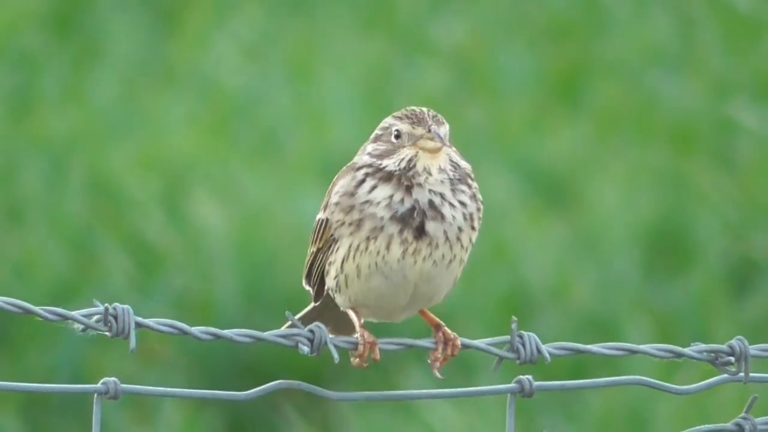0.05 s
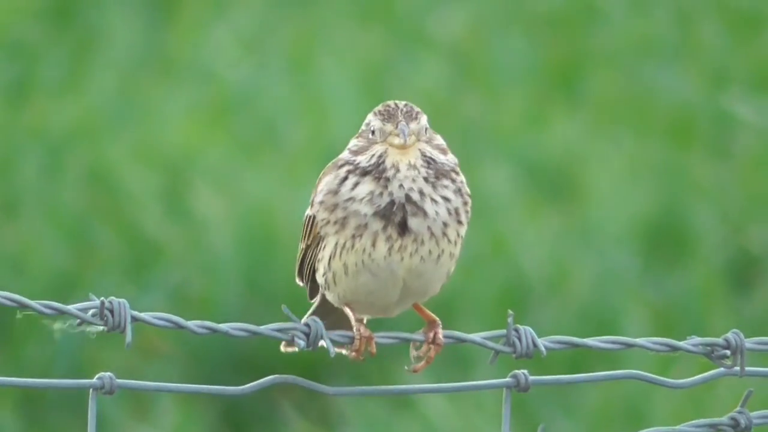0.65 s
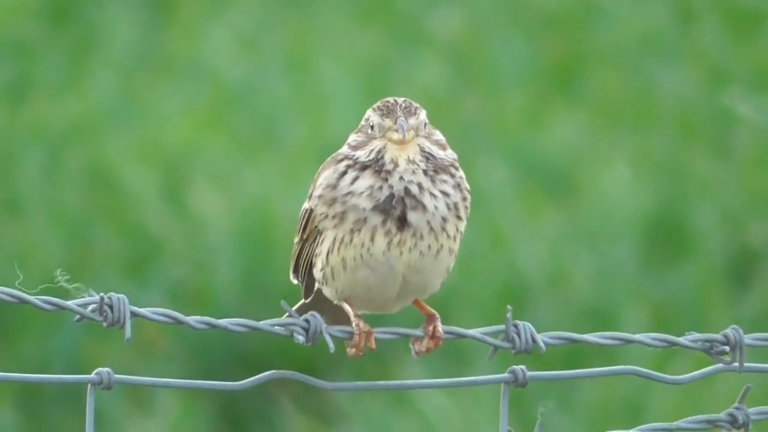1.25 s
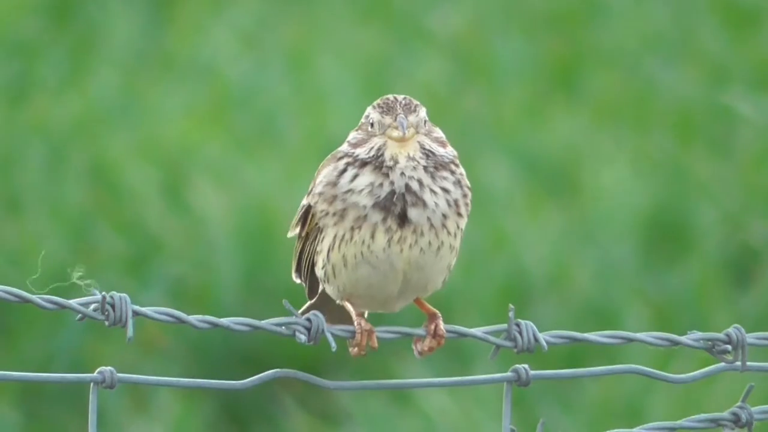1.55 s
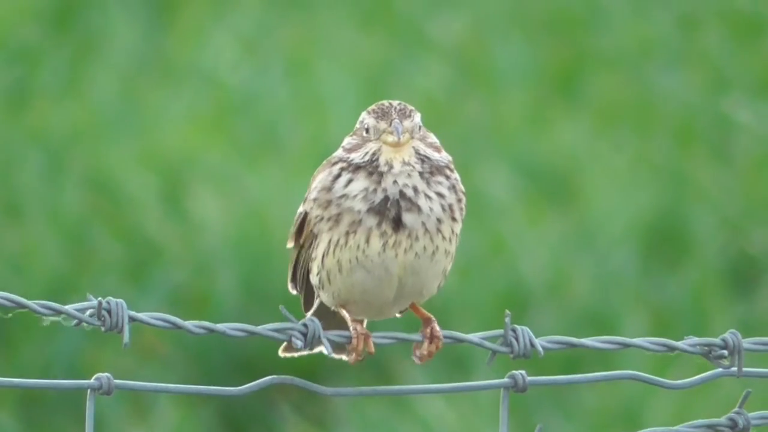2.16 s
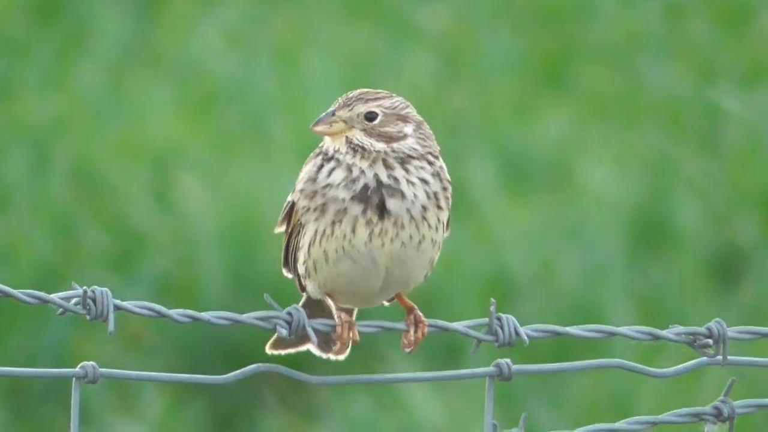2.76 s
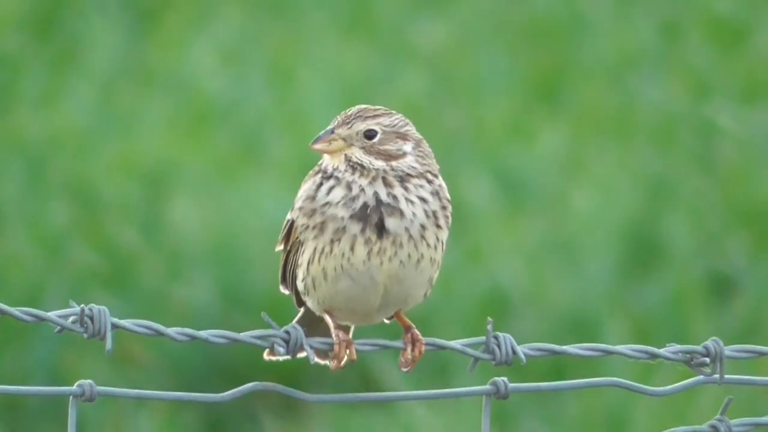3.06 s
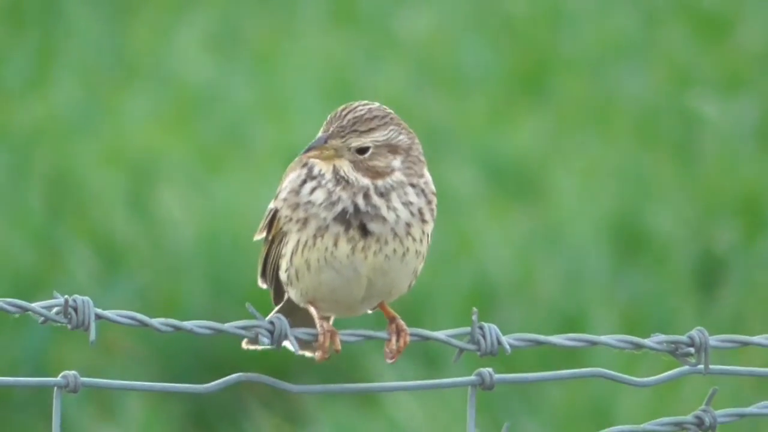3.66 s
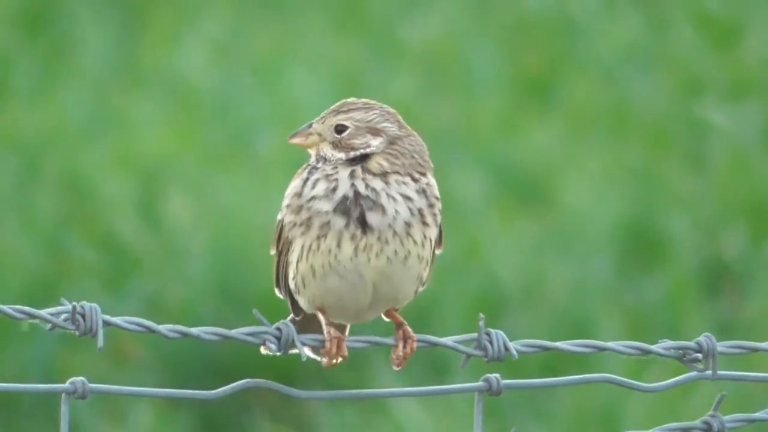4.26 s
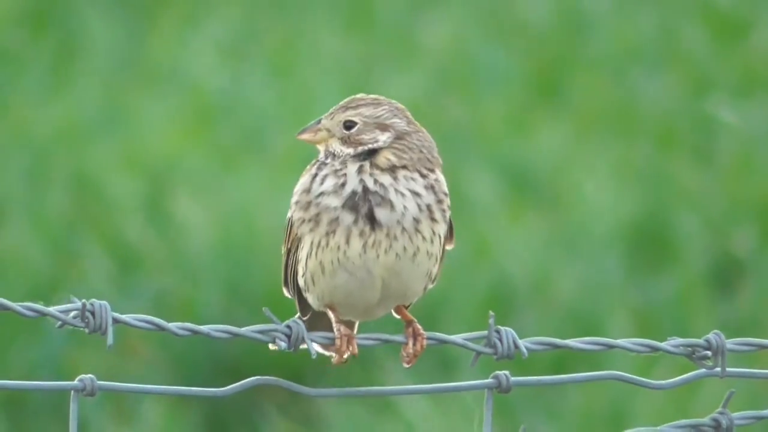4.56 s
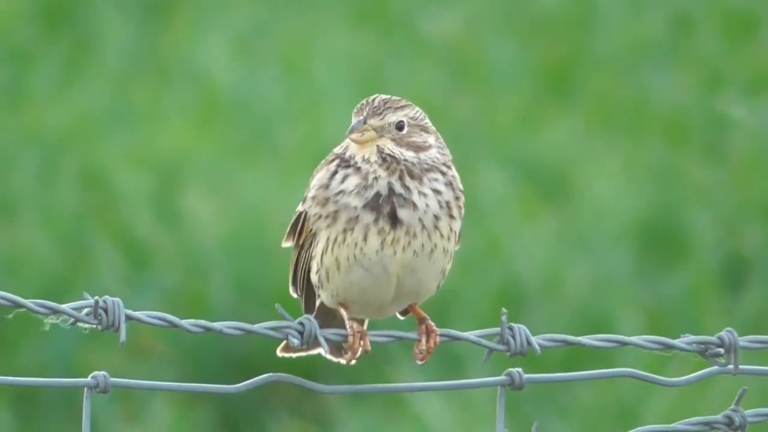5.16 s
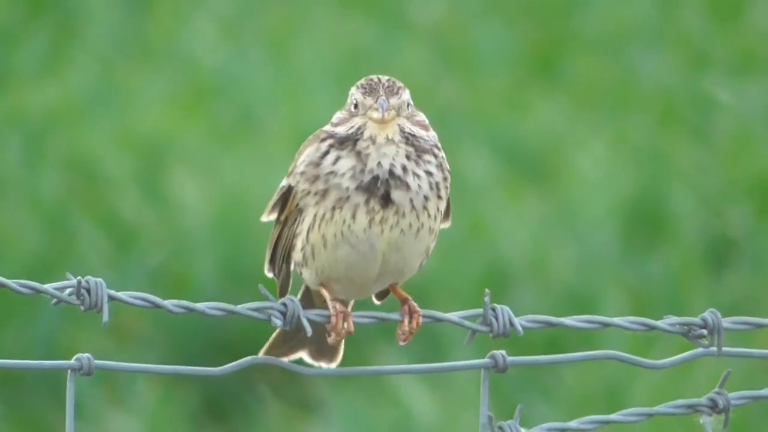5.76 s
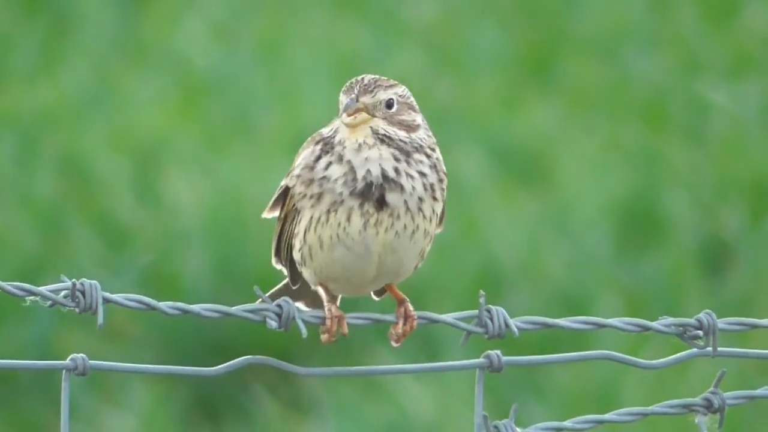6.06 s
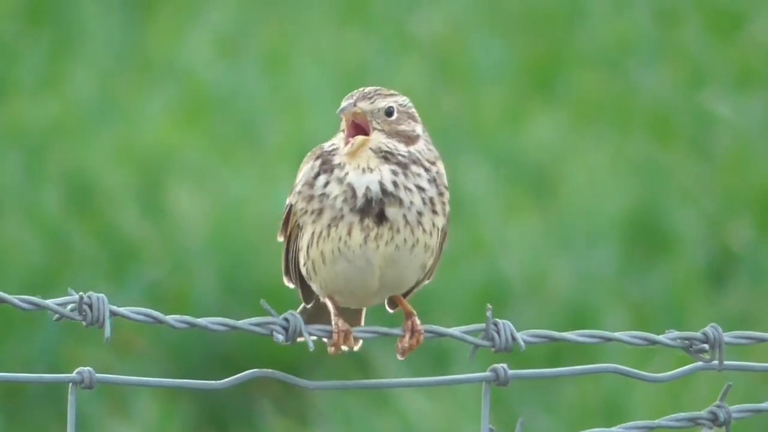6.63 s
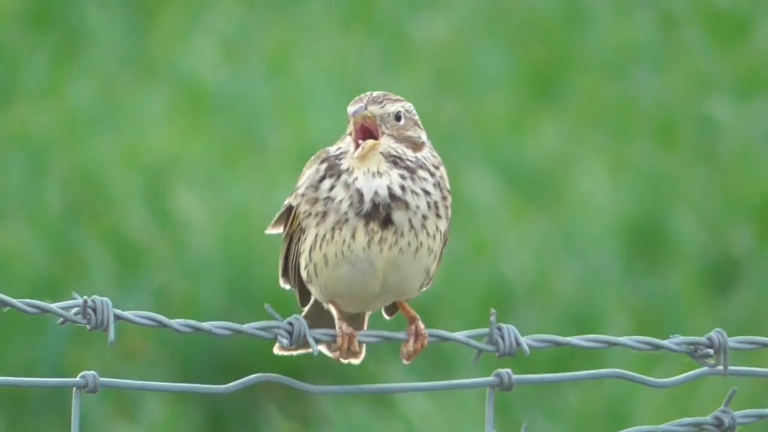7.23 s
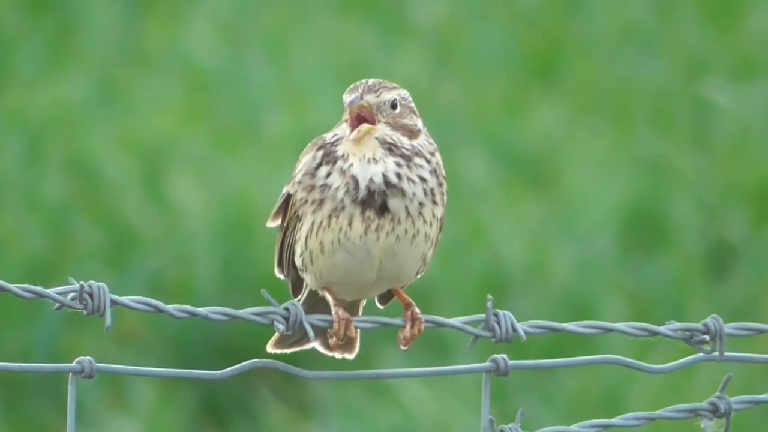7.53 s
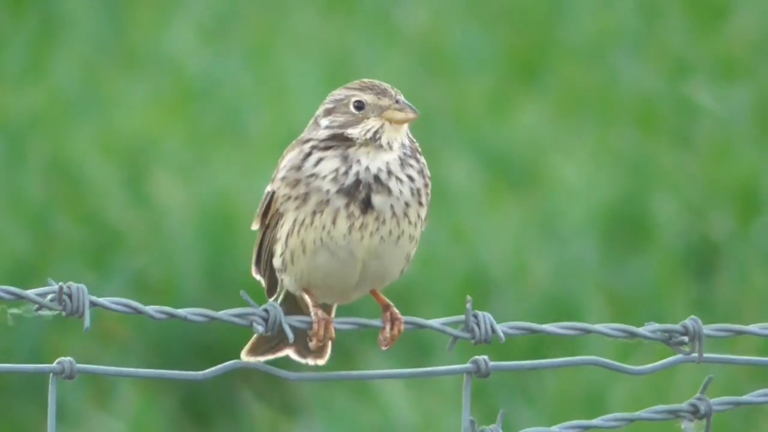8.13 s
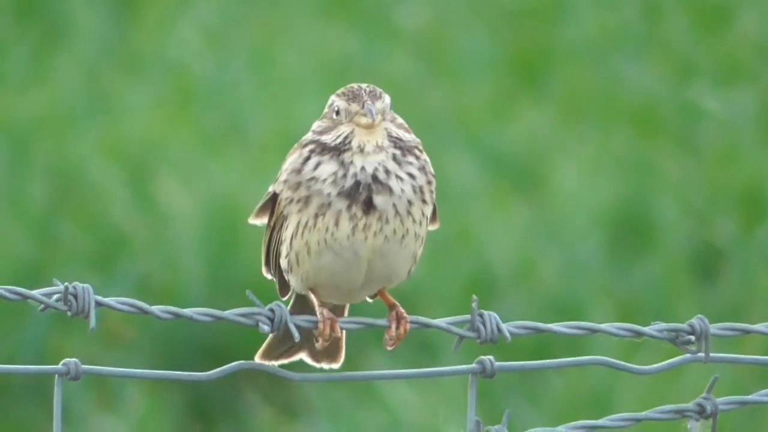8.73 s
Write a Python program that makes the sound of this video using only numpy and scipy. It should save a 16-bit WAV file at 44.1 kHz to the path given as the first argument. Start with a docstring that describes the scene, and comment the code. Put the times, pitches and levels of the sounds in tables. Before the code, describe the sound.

A small bird on a wire fence sings one short phrase, clear and near: sharp ticks, growing louder and faster, tumble into a high rattling jangle of buzzes and tiny whistles. For several seconds beforehand there is only quiet open countryside, with low wind and distant traffic, faint far birds, and the camera's own hiss and slight lens motor ticking. The same quiet background returns after the song.

```python
"""A bunting on a fence wire in an open field gives a few sharp ticks that speed into a dense jangle.
The two sides of its syrinx sound separate notes and trills, often at once; the grass scatters them.
Behind it: rumble of distant traffic and wind, faint far birds, and a camera's hiss and lens motor,
whose steps ring the camera body."""
import sys
import numpy as np
from scipy import signal
from scipy.fft import rfft, irfft
from scipy.io import wavfile
from scipy.ndimage import uniform_filter1d

SR = 44100
rng = np.random.default_rng(int(sys.argv[2]) if len(sys.argv) > 2 else 0)


def store_wav(level_fs):
    """Save 16-bit WAV to argv[1]."""
    pcm = np.round(np.clip(np.atleast_2d(level_fs), -1, 1) * 32767)
    wavfile.write(sys.argv[1], SR, pcm.T.astype(np.int16))


N = 396459
T = np.arange(N) / SR
HZ = np.fft.rfftfreq(N, 1 / SR)
SIDES = np.array([[.5], [-.5]])  # left, right


def amp(db):
    """Decibels to gain."""
    return 10 ** (np.asarray(db) / 20)


def unit(x):
    """Scales to rms 1."""
    return x / np.sqrt(np.mean(x ** 2))


def read(points):
    """Interpolates (Hz, value) rows onto HZ in log frequency."""
    hz, value = np.transpose(points)
    return np.interp(np.log(HZ + 1), np.log(hz + 1), value)


def noise(shape):
    """Noise of rms 1 with the given gains over HZ."""
    return unit(irfft(rfft(rng.standard_normal(N)) * shape, N))


def waver(top_hz):
    """Random motion of rms 1, rolling off at top_hz."""
    return noise(np.exp(-(HZ / top_hz) ** 2))


def air(spectrum, db):
    """Steady stereo noise, alike on both sides in the bass, less so higher up."""
    # Each row: frequency in Hz, left-right correlation.
    likeness = [(60, 0.92), (130, 0.99), (290, 0.46), (640, -0.19), (1410, 0.32), (3100, 0.32),
                (6820, 0.13), (15000, 0.17)]
    # Each row: frequency in Hz, left over right in dB.
    balance = [(60, 6.5), (110, 2.5), (200, 2), (380, 2.5), (700, 1), (1290, 0.5), (2380, -0.5),
               (4400, 0.0), (8120, 1.0), (15000, 0.0)]
    same = np.clip(read(likeness), -.3, .999)
    mid, side = rfft(rng.standard_normal((2, N))) * amp(read(spectrum))
    side *= np.sqrt((1 - same) / (1 + same))
    pair = irfft((mid + 2 * SIDES * side) * amp(SIDES * read(balance)), N)
    return amp(db) * pair / np.std(pair.mean(0))


def rumble():
    """Distant traffic and wind, swelling slowly."""
    # Each row: frequency in Hz, relative density in dB.
    spectrum = [(20, -37), (35, -14.5), (50, -7.5), (70, -14), (100, -3.5), (135, 1), (180, -4.5),
                (255, -4), (330, -11), (450, -15.5), (950, -17.5), (1150, -21.5), (1500, -23.5),
                (1900, -33), (2600, -71)]
    # Each row: time in seconds, relative level in dB.
    swell = [(0, -56), (1.2, -56), (1.8, -57), (3.3, -57.5), (3.7, -56.5), (5.2, -57.5), (5.8, -56.5),
             (7, -57), (8.2, -56), (8.99, -57)]
    return air(spectrum, db=-57.5) * unit(amp(np.interp(T, *np.transpose(swell))))


def hiss():
    """The camera's own steady noise."""
    # Each row: frequency in Hz, relative density in dB.
    spectrum = [(1700, -29), (1900, -3.5), (2130, 8), (2350, -2.5), (2800, -6), (3300, -2.5), (5000, -5),
                (6300, -8.5), (7200, -3.5), (7830, 0), (8600, -1), (10100, 1), (12000, -1), (15800, -1.5)]
    return air(spectrum, db=-70)


def lens_motor(uneven_db=2, balance_db=1, jitter_s=.00012, attack_s=.0014):
    """Each step rings the camera body; at full speed every second step is softer."""
    # Each row: start and end in seconds, speed name, level in dB.
    runs = [(0.029, .56, "slow", -70), (2.961, 2.97, "fast", -60.5), (4.108, 4.815, "fast", -63.5),
            (4.888, 5.9, "slow", -69), (8.304, 8.31, "fast", -61.5)]
    # Step rate by speed name.
    steps_per_s = {"slow": 25, "fast": 50}
    # Body modes. Each row: frequency in Hz, level in dB, t60 in seconds.
    modes = [(1401, -4.5, 0.07), (2380, 8, 0.01), (3180, -9, 0.013), (5140, -7, 0.01)]
    steps, chance = np.zeros(N), rng.uniform(-1, 1, N)
    for start, end, speed, db in runs:
        times = np.arange(start, end, 1 / steps_per_s[speed])
        at = np.round((times + jitter_s * rng.standard_normal(len(times))) * SR).astype(int)
        offbeat_db = -2.5 * (np.arange(len(at)) % 2) * (speed == "fast")
        steps[at] = amp(db + uneven_db * chance[at] + offbeat_db)
    t = np.arange(SR // 10) / SR
    ring = sum(amp(db - 60 * t / t60) * np.sin(2 * np.pi * hz * t) for hz, db, t60 in modes)
    ring *= 2 * (1 - np.exp(-(t / attack_s) ** 2))
    return signal.oaconvolve(steps, ring)[:N] * amp(SIDES * balance_db)


def note(mid_s, width_s, hz, glide_hz, db, overtone_db, squareness=2.2, arch=.012, reach=.62):
    """One gliding push of air, as a gesture: (samples, level, pitch in Hz, overtone in dB)."""
    at = np.arange(round((mid_s - 1.5 * width_s) * SR), round((mid_s + 1.5 * width_s) * SR))
    u = (at / SR - mid_s) / width_s
    pitch_hz = hz * (1 - arch * u ** 2) + glide_hz * reach * np.tanh(u / reach)
    return at, amp(db) * .5 ** (abs(2 * u) ** squareness), pitch_hz, overtone_db


def voice(gestures, jitter, jitter_hz, shimmer_db, settle_s=.0047):
    """One oscillator follows its gestures; returns complex tone, level and overtone level."""
    level, overtone, weight, weighted_hz = np.zeros((4, N))
    shake, tremor = waver(jitter_hz), waver(jitter_hz / 2)
    for at, push, hz, overtone_db in gestures:
        unsteady = 1 / (1 + len(at) / SR / settle_s)  # short notes waver more
        push = push * amp(shimmer_db * unsteady * tremor[at])
        level[at] += push
        overtone[at] += push * amp(overtone_db)
        weight[at] += push ** 2  # the stronger gesture leads the pitch
        weighted_hz[at] += push ** 2 * hz * (1 + unsteady * jitter * shake[at])
    turns = np.cumsum(weighted_hz / (weight + 1e-30)) / SR
    return level * np.exp(2j * np.pi * turns), level, overtone


def scatter(x, t60_s, delay_s):
    """Decaying reflections of random sign, different left and right."""
    t = np.arange(SR // 2) / SR
    taps = rng.choice([-1., 1.], (2, len(t))) * (rng.random((2, len(t))) < .15)
    taps *= amp(-60 * t / t60_s) * (t > delay_s)
    return signal.oaconvolve(x[None], taps / np.linalg.norm(taps[0]), axes=1)[:, :N]


def far_birds(direct_db=-10, wet_db=-6, overtone_db=-29):
    """Thin warbling notes and one rough, low rising call, blurred by distance."""
    # Each row: middle and width in seconds, pitch in Hz, glide in Hz per width, source level in dB.
    warble_notes = [(2.15, .04, 5300, -100, -80), (2.228, .02, 5250, 700, -74), (2.31, .05, 5420, 25, -83),
                    (2.88, .11, 5220, -46, -75.5), (3.005, .09, 5600, 0, -74),
                    (3.19, .055, 5150, 26, -74.5), (3.3, .08, 5320, 300, -72), (3.51, .11, 5850, 400, -76),
                    (3.7, .14, 5230, 20, -82)]
    # One such row.
    call_note = (2.592, .085, 980, 520, -55)
    notes = [note(*row, overtone_db) for row in warble_notes]
    warble = voice(notes, jitter=.04, jitter_hz=300, shimmer_db=10, settle_s=.212)
    call = voice([note(*call_note, overtone_db)], jitter=.05, jitter_hz=200, shimmer_db=5, settle_s=.2)
    tone, level, overtone = (a + b for a, b in zip(warble, call))
    song = (tone + overtone * (tone / (level + 1e-12)) ** 2).real
    return amp(direct_db) * song + amp(wet_db) * scatter(song, t60_s=.4, delay_s=.004)


def tick(s, db, body_hz=3400, snap_hz=4900, ring_hz=6500):
    """The syrinx snaps open after a faint first try; both sides ring for an instant."""
    return [("low", note(s - .008, .004, body_hz, 800, db - 14, overtone_db=7)),
            ("low", note(s - .0015, .0021, body_hz, 500, db - 3, overtone_db=6.2)),
            ("low", note(s, .00064, snap_hz, 1200, db + 2, overtone_db=7.9)),
            ("high", note(s + .001, .0027, ring_hz, 500, db - 3, overtone_db=-7))]


def chip(s, db, hz=3440, stutter_hz=3300, gap_s=.0068, step_db=9):
    """Two brief, growing pulses lead into a short low note."""
    stutter = [("low", note(s - k * gap_s, .0017, stutter_hz, 30, db - k * step_db, -11))
               for k in (1, 2)]
    return stutter + [("low", note(s, .0056, hz, 260, db, -16.5, squareness=3.6))]


def chink_run(first_s, count, gap_s, stretch, width_s, lead_s, low_hz, high_hz, glide_hz,
              upbeat_db, low_db, high_db, growth_db, overtone_db,
              upbeat_s=.0062, upbeat_hz=4800, catch_s=.0018, detune=.016, uneven_db=2):
    """The low side gives an upbeat and a rising note, and catches as the high side joins above it."""
    order, gestures = np.arange(round(count)), []
    times = first_s + np.cumsum(np.r_[0, gap_s * stretch ** order[:-1]])
    ramp_db = growth_db * (order - order.mean()) / max(order[-1], 1)
    for s, db, chance in zip(times, ramp_db, rng.standard_normal((len(order), 3))):
        low_ratio, high_ratio = 1 + detune * chance[:2]
        shift_db = uneven_db * chance[2]  # air spent on the upbeat is missing from the low note
        upbeat = note(s - lead_s - upbeat_s, .0026, upbeat_hz * low_ratio, 380,
                      upbeat_db + db + shift_db, overtone_db)
        low = note(s - lead_s, .8 * width_s, low_hz * low_ratio, glide_hz,
                   low_db + db - shift_db, overtone_db)
        catch = note(s - catch_s, .0015, .93 * low_hz, glide_hz, low_db + db - 5, overtone_db)
        high = note(s, width_s, high_hz * high_ratio, glide_hz, high_db + db, overtone_db, squareness=3)
        gestures += [("low", upbeat), ("low", low), ("low", catch), ("high", high)]
    return gestures


def flutter(clash, level, rate_hz=235, wander=.2, clash_db=-8, voice_db=-30, linger_s=.007):
    """Uneven puffs ring the throat: faint under each note, stronger and lingering after a clash."""
    # Each row: frequency in Hz, relative gain in dB.
    throat = [(3400, -28.5), (4100, -21), (4700, 3.5), (5600, 6), (6600, 7.5), (7600, -9),
              (9000, -10), (11300, -9.5), (13200, -12), (15500, -15)]
    puffs = np.sin(np.pi * np.cumsum(rate_hz * (1 + wander * waver(63.5))) / SR) ** 2
    breath = irfft(rfft(puffs * rng.standard_normal(N)) * amp(read(throat)), N)
    jolt = clash - uniform_filter1d(clash, size=400)
    pole = np.exp(-1 / (linger_s * SR))
    lingering = np.sqrt(signal.lfilter([1 - pole], [1, -pole], jolt ** 2 + 1e-20))
    return unit(breath) * (amp(clash_db) * lingering + amp(voice_db) * level)


def trill(start_s, end_s, rate_hz, hz, swing_hz, first_db, last_db, depth, overtone_db, ease=2.9):
    """A buzz: level and pitch pulse together, no two pulses alike."""
    at = np.arange(round(start_s * SR), round(end_s * SR))
    beats = rate_hz * (at / SR - start_s)
    slip, sharp, accent_db = (np.interp(beats, np.arange(40), r) for r in rng.standard_normal((3, 40)))
    cycle = 2 * np.pi * (beats + .09 * slip)
    pitch_hz = hz * (1 + .014 * sharp) - swing_hz * np.sin(cycle)
    swell = amp(last_db + (first_db - last_db) * np.linspace(1, 0, len(at)) ** ease + accent_db)
    pulsing = 1 - np.clip(depth, 0, 1) * (1 + np.cos(cycle)) / 2
    return at, swell * pulsing * signal.windows.tukey(len(at), .08), pitch_hz, overtone_db


def slur(points):
    """A long low-side whistle gliding along its curve."""
    times, *controls = np.transpose(points)
    at = np.arange(round(times[0] * SR), round(times[-1] * SR))
    hz, db, overtone_db = (np.interp(at / SR, times, control) for control in controls)
    return [("low", (at, amp(db) * signal.windows.tukey(len(at), .1), hz, overtone_db))]


def whistle(start_s, end_s, hz, db, overtone_db, crack_db,
            skew=2.5, fullness=.65, rise_hz=110, sag_hz=520):
    """Swells slowly, stops fast. Given crack_db, it is pushed too far: pitch sags, both sides crack."""
    at = np.arange(round(start_s * SR), round(end_s * SR))
    u = np.linspace(0, 1, len(at))
    push = amp(db) * abs(np.sin(np.pi * u ** skew)) ** fullness
    if crack_db is None:
        return [("low", (at, push, hz + rise_hz * (u - .5), overtone_db))]
    return [("low", (at, push, hz - sag_hz * u ** 6, overtone_db)),
            ("low", note(end_s + .0006, .0028, hz=5000, glide_hz=-350, db=crack_db - 6, overtone_db=-9)),
            ("high", note(end_s + .0014, .0026, hz=6650, glide_hz=180, db=crack_db, overtone_db=-12))]


def sweep(start_s, length_s, top_hz, db, end_hz=4750, curve=1.46, break_db=-7):
    """Pitch drops steeply, then slower; the tone breaks briefly and grows fuller and purer."""
    at = np.arange(round(start_s * SR), round((start_s + length_s) * SR))
    remaining = np.linspace(1, 0, len(at))
    dip_db = break_db * np.exp(-((remaining - .66) / .08) ** 2)
    push = amp(db - 2 * remaining ** 2 + dip_db) * signal.windows.tukey(len(at), .55)
    pitch_hz = end_hz + (top_hz - end_hz) * remaining ** curve
    overtone_db = -17 + 9 * remaining
    return [("low", (at, push, pitch_hz, overtone_db))]


def phrase(side):
    """All gestures of the "low" or "high" side of the syrinx, with levels ahead of the beak."""
    # Each row of both: time in seconds, level in dB.
    ticks = [(5.6657, -52), (6.0356, -45.5)]
    chips = [(6.2096, -29.5), (6.355, -28.5)]
    # Each row: start in seconds, count, first gap in seconds, ratio of successive gaps, width and
    # low side's lead in seconds, low pitch, high pitch and glide in Hz, then upbeat, low level,
    # high level, growth over the run and overtone in dB.
    chink_runs = [(6.46, 4, .0163, .95, .003, -0.00012, 4780, 6290, 400, -36.5, -26, -29.5, 2.5, -13),
                  (6.528, 3, .0137, .84, .0024, -0.0018, 4780, 6420, 900, -52, -29, -32, 2, -10),
                  (6.5585, 1, 0, 1, .0032, 0, 4820, 6450, 250, -34, -38, -27.5, 0, -9),
                  (6.622, 1, 0, 1, .0055, -0.0015, 4700, 6220, 280, -28.5, -23, -27.5, 0, -12),
                  (6.6564, 5, .0125, 1.11, .004, 0.0019, 5050, 6530, 524, -31.5, -28.5, -21, 3.5, -16),
                  (6.7435, 1, 0, 1, .003, -0.001, 4970, 6490, 300, -29, -34, -27.5, 0, -11),
                  (6.8137, 4, .0113, 1.32, 0.0039, .002, 4910, 6490, 480, -26.5, -26.5, -20, 1.5, -15),
                  (6.9459, 3, .0156, 1, 0.0053, 0.0021, 5150, 6790, 449, -33.5, -33, -24, -6, -13.5),
                  (7.0052, 2, .011, 1, .0046, -0.0052, 5190, 6630, 251, -32, -26, -23.5, 5, -17),
                  (7.126, 1, 0, 1, .0037, 0, 5200, 6830, 550, -45, -34, -22, 0, -8),
                  (7.1463, 3, .0097, 1, 0.0026, 0.00066, 4880, 6700, 380, -35, -28, -23, 0, -9),
                  (7.1785, 1, 0, 1, .0023, 0, 5580, 6870, 100, -50, -45, -30.5, 0, -8.5),
                  (7.1929, 5, .011, .97, .004, -0.0022, 5680, 6960, 450, -46, -35, -25, 2.5, -8),
                  (7.4692, 2, .0166, 1, .0072, 0.0044, 5400, 6970, 700, -56, -50, -16, 0, -15)]
    # Each row: side, start and end in seconds, pulse rate, pitch and swing in Hz,
    # first and last level in dB, depth 0-1, overtone in dB.
    trills = [("low", 6.578, 6.62, 295, 4580, 110, -46.5, -23.5, 0.81, -22),
              ("high", 6.571, 6.614, 295, 6300, 150, -50, -42, .9, -6),
              ("low", 6.7524, 6.803, 240, 4730, 120, -29, -25, 1, -13.5),
              ("high", 6.7558, 6.804, 190, 6570, 220, -35, -26, .9, -17),
              ("high", 6.872, 6.928, 480, 7930, 379, -38.5, -24, .43, -9),
              ("low", 6.979, 7.0, 210, 4950, 150, -39, -31.5, .9, -11),
              ("low", 7.286, 7.304, 300, 5100, -220, -17.5, -29.5, 0.62, -14)]
    # One curve per slur. Each point: time in seconds, pitch in Hz, level and overtone in dB.
    slurs = [
        [(6.877, 5340, -41, -3), (6.89, 5300, -29.5, -3), (6.92, 5225, -26, -11), (6.932, 5110, -35, -20)],
        [(7.035, 5750, -51, -6), (7.054, 5790, -28, -5), (7.095, 5600, -32.5, -4), (7.11, 5810, -40, -6),
         (7.124, 6250, -30, -7.5)],
        [(7.326, 4280, -48, -6), (7.3415, 4370, -31, -6.5), (7.346, 4840, -18, -24), (7.352, 5300, -15, -21),
         (7.364, 5500, -19, -25.5), (7.372, 5750, -28, -10), (7.38, 5560, -39, -10)],
    ]
    whistles = [(7.247, 7.264, 5550, -25, -12, -19), (7.273, 7.29, 5560, -23, -16, -28.5),
                (7.381, 7.3955, 5470, -25, -14, -17.5), (7.407, 7.4235, 5500, -20.5, -17.5, -20),
                (7.43, 7.449, 5430, -21, -14, -17.5), (7.496, 7.521, 5800, -25.5, -10, None),
                (7.518, 7.543, 5720, -22.5, -18.5, None), (7.542, 7.562, 5640, -22, -22, None),
                (7.567, 7.5845, 5660, -23, -21, None), (7.59, 7.608, 5580, -19, -19, None)]
    # Each row: start and length in seconds, top pitch in Hz, level in dB.
    sweeps = [(7.622, .012, 6700, -22), (7.6502, .012, 7940, -21), (7.6798, .0135, 7450, -21),
              (7.711, .0125, 7350, -24)]
    kinds = [(tick, ticks), (chip, chips), (chink_run, chink_runs), (whistle, whistles), (sweep, sweeps)]
    syllables = [sing(*row) for sing, table in kinds for row in table]
    syllables += [slur(points) for points in slurs]
    notes = [gesture for syllable in syllables for who, gesture in syllable if who == side]
    return notes + [trill(*row) for who, *row in trills if who == side]


def bunting(second_db=-2, third_db=-6, beat_db=-33, rasp_db=-21, sizzle_db=-17,
            quaver_db=1.9, quaver_hz=560, gape_s=6.41, grass_db=-20, field_db=-39):
    """Both sides of the syrinx share one airway, so their overtones come with sum and beat tones."""
    # Throat and beak response. Each row: frequency in Hz, gain in dB.
    beak = [(2500, -2), (3400, -2), (4400, -2.5), (6800, -1), (8000, 5), (9000, -2), (10500, 2.5),
            (12000, 3.5), (13300, 0.5), (14500, -5.5), (16000, -13.5)]
    # The wide beak holds back the lower treble. Each row: frequency in Hz, gain in dB.
    gape = [(3000, -4), (3650, -9), (4150, 0)]
    # Each row: frequency in Hz, left over right in dB.
    balance = [(3400, 0.7), (4500, -2.5), (5500, -2.5), (6500, 2), (7700, 3.9), (10000, 2), (14000, -1.8)]
    # Each row: frequency in Hz, left's phase lead in radians.
    phase_lead = [(3400, -0.28), (4500, 0.27), (6500, 0.202), (7700, .1), (10000, -0.31), (14000, -0.4)]
    low_tone, low_level, low_overtone = voice(phrase("low"), .046, jitter_hz=1460, shimmer_db=-.5)
    high_tone, high_level, high_overtone = voice(phrase("high"), .074, jitter_hz=1500, shimmer_db=2)
    tone, level = low_tone + high_tone, low_level + high_level
    shape = tone / (level + 1e-12)
    harmonics = amp(second_db) * shape ** 2 + amp(third_db) * shape ** 3
    song = (tone + (low_overtone + high_overtone) * harmonics).real
    song *= amp(quaver_db * np.tanh(waver(quaver_hz)))
    # Where the sides clash they beat and the airflow turns rough.
    clash = np.sqrt(low_level * high_level)
    beat = (high_tone * np.conj(low_tone)).real / (clash + 1e-12)
    beat = irfft(rfft(beat) * (HZ > 2400), N)
    rasp = clash * noise(HZ > 3900)
    sizzle = high_overtone * noise(HZ > 8800)
    song += amp(beat_db) * beat + amp(rasp_db) * rasp + amp(sizzle_db) * sizzle
    # The beak is narrow for ticks and chips, wide from gape_s on.
    opening = song * (T < gape_s)
    jangle = (song + flutter(clash, level)) * (T >= gape_s)
    song = irfft((rfft(opening) + rfft(jangle) * amp(read(gape))) * amp(read(beak)), N)
    pan = amp(SIDES * read(balance)) * np.exp(1j * SIDES * read(phase_lead))
    direct = irfft(rfft(song) * pan, N)
    grass = amp(grass_db) * scatter(song, t60_s=.07, delay_s=.0052)
    field = amp(field_db) * scatter(song, t60_s=.3, delay_s=.025)
    return direct + grass + field


def scene():
    """The near bird over the field and the camera's own sounds, in stereo."""
    return bunting() + far_birds() + rumble() + hiss() + lens_motor()


def record(dry, edge_hz=15950):
    """Steep low-pass at edge_hz."""
    taps = signal.firwin(511, edge_hz, window=("kaiser", 9), fs=SR)
    return signal.oaconvolve(dry, taps[None], "same")


dry = scene()
out = record(dry)
store_wav(out)
```